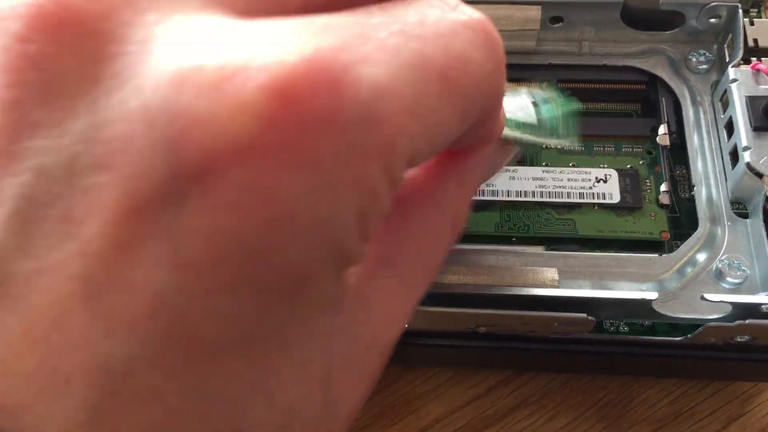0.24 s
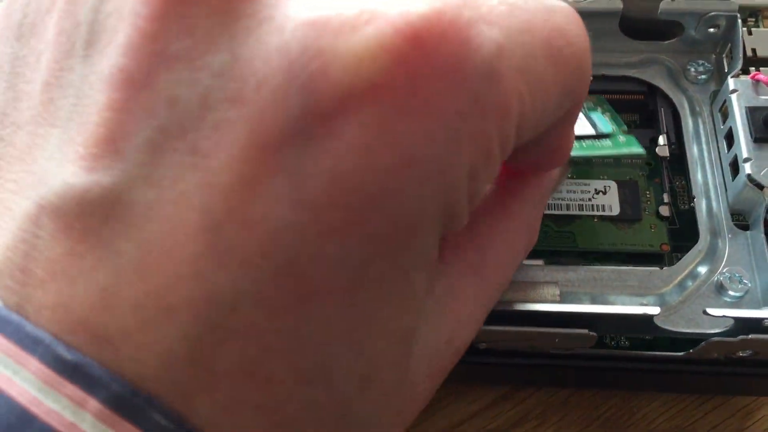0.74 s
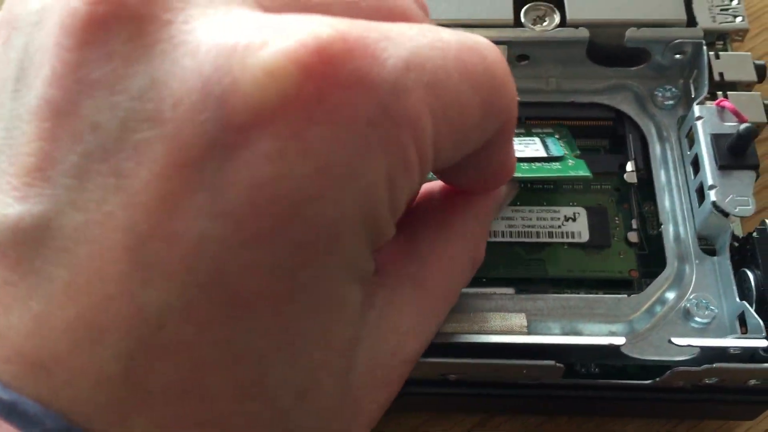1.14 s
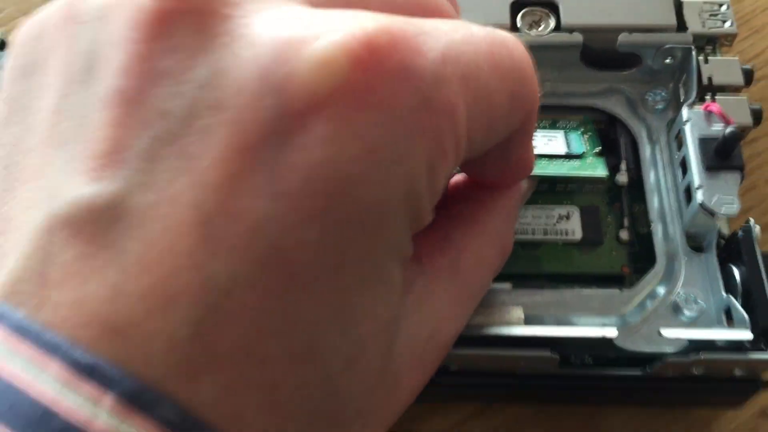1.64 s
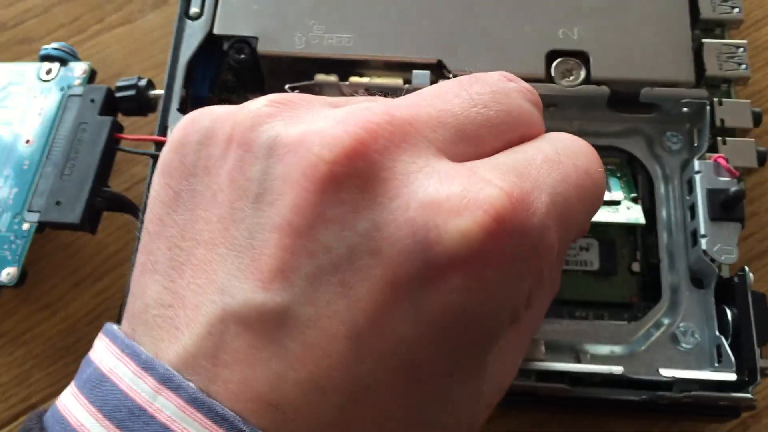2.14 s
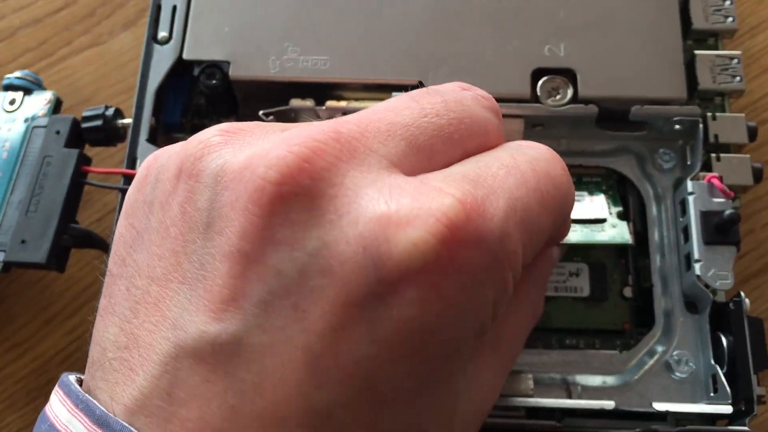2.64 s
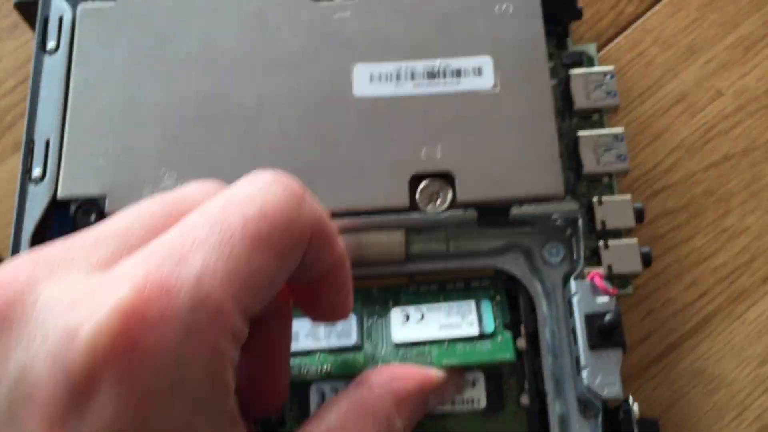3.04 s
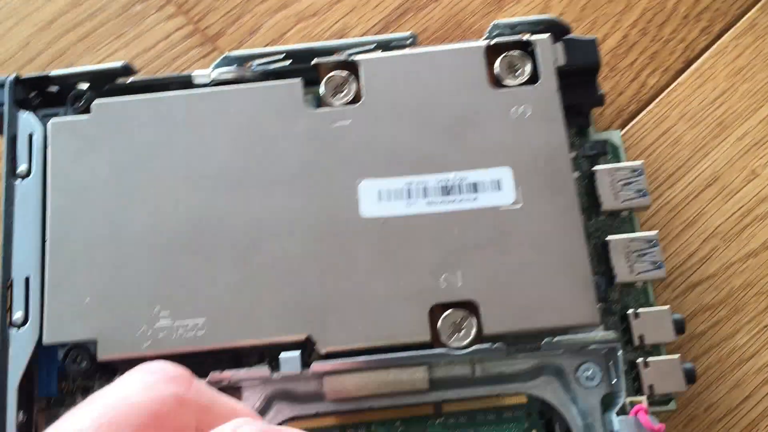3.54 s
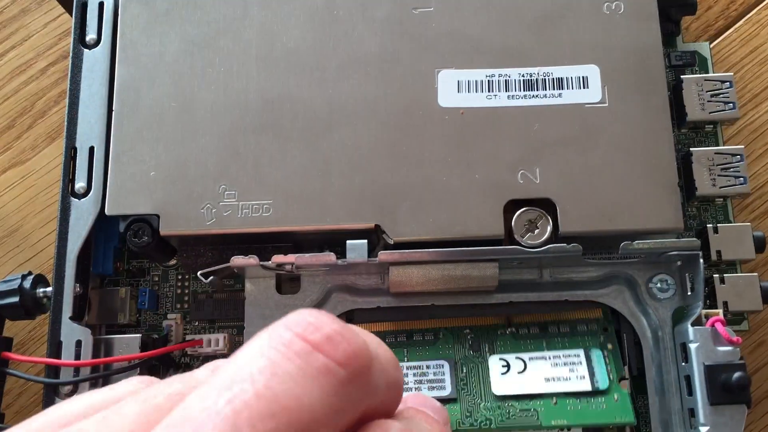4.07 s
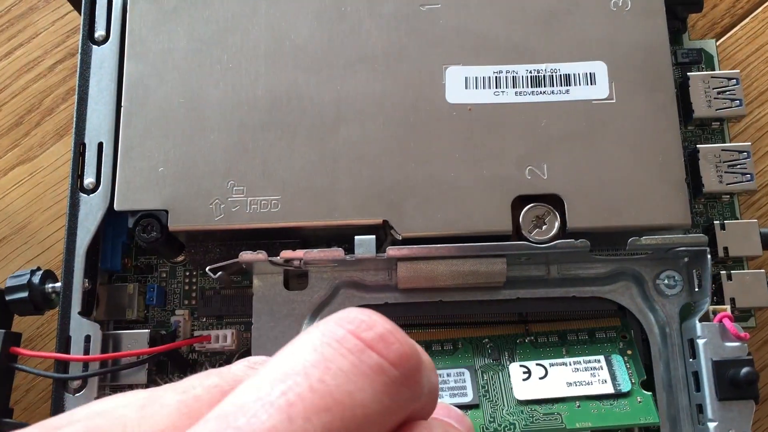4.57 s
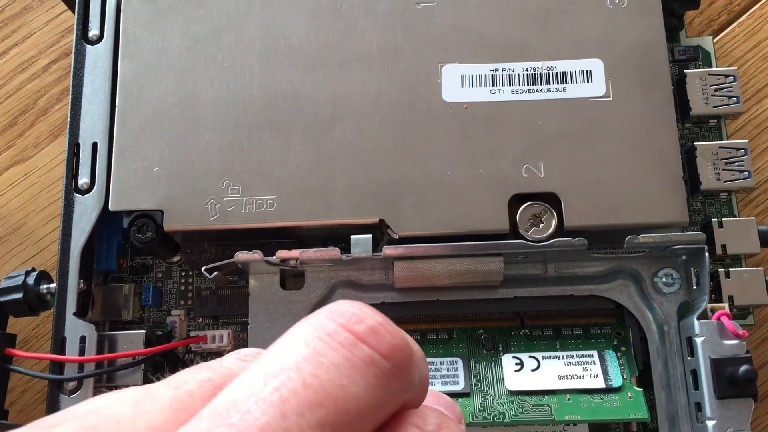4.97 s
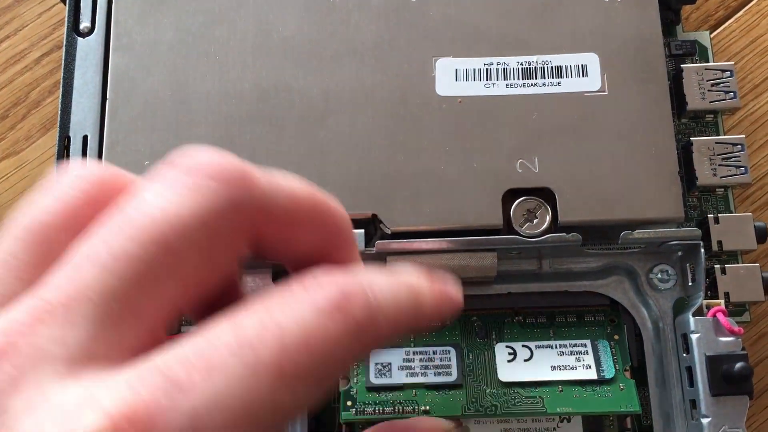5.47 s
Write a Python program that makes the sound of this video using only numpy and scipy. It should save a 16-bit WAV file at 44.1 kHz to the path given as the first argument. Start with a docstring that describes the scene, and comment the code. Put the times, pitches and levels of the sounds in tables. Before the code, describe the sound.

One sharp metallic click, a few faint ticks, then a run of small clicks as a memory module is pressed into a computer.

```python
"""A memory module is worked into its slot in a small open computer on a wooden table, heard up close.
It knocks once on the steel chassis, scrapes and ticks into place, creaks as it is pressed down, and
snaps into its clips. Each click rings the chassis, the circuit board and the contacts. Fingers rub,
a hand bumps the table, and a small room answers over a low rumble."""
import sys
import numpy as np
from scipy import signal
from scipy.fft import rfft, irfft
from scipy.io import wavfile

SR = 44100
rng = np.random.default_rng(int(sys.argv[2]) if len(sys.argv) > 2 else 0)


def int16_out(signal):
    """Quantize to a 16-bit WAV file."""
    q = np.round(np.clip(np.atleast_2d(signal).T, -1, 1) * 32767)
    wavfile.write(sys.argv[1], SR, q.astype(np.int16))


N = 251811
TIME = np.arange(N) / SR

# The tone of the room's air and of rubbing. Each row: frequency in Hz, relative level in dB.
AIR_TONE = [(15, -26), (28, -33), (53, 1), (82, -13), (125, -10), (185, -19), (320, -15), (450, -34.5),
            (1300, -32.5), (2300, -40), (3000, -43), (3800, -47.5), (8000, -51), (15500, -55.5)]
RUB_TONE = [(400, -7.5), (900, 4.5), (1350, -14), (1900, -3), (2700, -8.5), (3800, -9.5), (6500, -19),
            (10000, -37), (15500, -29.5)]
# The room's hums. Each row: pitch in Hz, width in Hz, level in dB.
ROOM_HUMS = [(53.15, 7, -58), (119.9, 21, -64.5), (170.6, 8, -71.5), (343.6, 4.7, -68)]
# The shape of the bass's rise and fall. Each row: time in seconds, relative level in dB.
BASS_SWELLS = [(0.0, -54.5), (1.46, -58.5), (1.69, -52), (2.07, -57.5), (2.37, -53), (2.94, -54.5),
               (3.4, -56), (3.5, -55.5), (3.94, -54), (4.47, -53.5), (5.06, -56), (5.71, -53)]
# Rubs along the chassis. Each row: middle in seconds, half length in seconds, level in dB.
RUB_STROKES = [(0.207, 0.045, -73), (1.288, 0.044, -68), (1.848, 0.11, -70.5), (3.078, 0.43, -75.5),
               (3.856, 0.087, -68.5), (4.35, 0.13, -81), (4.7, 0.023, -62.5), (5.257, 0.033, -65),
               (5.7, .04, -79.5)]
# The module's slips. Each row: start in seconds, length in seconds, chassis level in dB,
# centre of the chassis ring in Hz, board level in dB, contact level in dB.
SLIPS = [(0.0984, .003, -76, 1200, -63, -65), (0.1084, .0012, -63, 1360, -56, -53),
         (0.381, 0.0028, -56, 1200, -53, -52.5), (0.4101, .0012, -18, 1560, -26, -25.5),
         (1.212, 0.0037, -57.5, 1910, -65, -80), (1.291, 0.02, -61.5, 1610, -58, -69.5),
         (1.631, 0.0099, -52.5, 1577, -53.5, -60.5), (1.813, .004, -61.5, 1880, -71, -85),
         (1.909, 0.011, -54.5, 1080, -60.5, -68), (1.9272, 0.0014, -39, 1450, -52, -49.5),
         (2.523, 0.0052, -58, 1245, -74, -87.5), (2.891, .005, -52.5, 1310, -57, -68.5),
         (3.249, 0.0026, -53, 1345, -57, -62.5), (3.813, .007, -65, 1230, -67, -79),
         (4.0554, 0.0032, -58.5, 1130, -62.5, -77.5), (4.1227, 0.0036, -58.5, 1150, -62, -74),
         (4.168, .0045, -40.5, 1440, -67, -73.5), (4.2445, 0.0036, -28.5, 1300, -37.5, -45.5),
         (4.3176, .0032, -43.5, 1273, -56, -67.5), (4.458, .006, -55.5, 1195, -77, -92),
         (4.651, 0.0057, -55.5, 1310, -79, -88), (4.693, 0.016, -47, 1440, -58.5, -66),
         (4.707, 0.0023, -33.5, 1280, -39.5, -64), (4.7935, 0.0025, -34, 1510, -38.5, -42.5),
         (4.836, 0.0063, -37.5, 1280, -53, -64.5), (4.9, 0.005, -51.5, 1230, -77.5, -97),
         (5.085, 0.0044, -56.5, 1160, -58, -86), (5.0993, 0.0018, -28, 1194, -41.5, -54.5),
         (5.1513, 0.0015, -43, 1290, -53.5, -64), (5.197, 0.0078, -41.5, 1180, -54, -67),
         (5.213, 0.016, -42, 1170, -53.5, -71), (5.2564, 0.0033, -37.5, 1245, -51, -68),
         (5.327, 0.0039, -59, 1440, -57.5, -70.5), (5.3985, 0.0023, -33.5, 1200, -37, -38.5),
         (5.6067, 0.0038, -62, 1350, -61, -68.5)]
# The notes each part rings with. Each row: pitch in Hz, relative level in dB, seconds to fade by 60 dB.
CONTACT_NOTES = [(6713, 5, .006), (8700, -2.5, .007), (8905, 4, 0.0058), (9400, 3, .01), (9810, -9.5, .008),
                 (11400, -2.5, .006), (11780, -3, .006), (12260, -6.5, 0.0081), (13400, -5.5, 0.0066),
                 (14680, -7, 0.0062)]
BOARD_NOTES = [(2437, -1.5, 0.043), (2640, -0.5, 0.014), (2828, -9, 0.072), (2958, -6, 0.05),
               (3140, -3, 0.035), (3330, -5, .03), (3422, -1.5, 0.028), (4180, -5.5, 0.062),
               (4600, -5.5, 0.018), (5470, 2.5, 0.015), (5860, 6.5, 0.02), (6267, -3.5, 0.042)]
CHASSIS_NOTES = [(668, 5, 0.052), (847.6, 2, 0.11), (936, -5.5, 0.0553), (997, -3, 0.047),
                 (1098, -13.5, 0.041), (1237, -4.5, 0.07), (1317, -0.5, 0.11), (1440, -7.5, 0.064),
                 (1530, -16, 0.0613), (1610, 0, 0.041), (1776, 1, 0.011), (1926, 0, 0.056), (2111, 1, 0.15),
                 (2340, -10.5, 0.044)]
TABLE_NOTES = [(95, -6.5, 0.19), (164, -7, 0.28), (214.4, -2, 0.076), (347.7, 1.5, 0.14),
               (447, -9.5, 0.029), (585, -15.5, 0.048)]
# The room's echo. Each row: frequency in Hz, level in dB against the direct sound, seconds to fade 60 dB.
ROOM_ECHO = [(100, -16.5, 0.42), (340, -1, 0.63), (700, -8.5, 0.35), (1529, -14.5, 0.75), (2107, -10, 0.56),
             (2930, -15, 0.66), (4550, -14, 0.51), (6540, -16, 0.61), (11000, -18.5, .33),
             (13896, -11.5, 0.32)]
# Single notes of the chassis, board or contacts that ring on after some clicks.
# Each row: start in seconds, pitch in Hz, level in dB, seconds to fade by 60 dB.
LINGERING_NOTES = [(.4103, 11400, -13.5, 0.0068), (0.4115, 1544, -22, 0.074), (1.631, 9120, -51.5, 0.037),
                   (1.928, 4400, -39, 0.015), (1.928, 826, -48.5, .15), (3.249, 2990, -40, 0.023),
                   (5.397, 2828, -22, 0.017), (5.4, 1850, -28.5, 0.048), (5.4, 838, -37, 0.11),
                   (5.4, 6030, -22, 0.0063)]
# The board's edge drags. Each row: middle in seconds, half length in seconds, pitch in Hz, level in dB.
EDGE_DRAGS = [(1.295, .02, 1640, -63.5), (1.295, 0.017, 3200, -70), (2.529, .01, 1286, -61),
              (3.76, 0.0084, 2500, -67), (3.825, 0.02, 2500, -68.5), (4.015, 0.022, 2184, -68),
              (4.059, 0.0025, 2650, -48.5), (4.058, 0.0045, 3580, -62.5), (4.476, 0.01, 1180, -61)]
# The hand bumps the table. Each row: middle in seconds, level in dB, pitch in Hz.
HAND_BUMPS = [(1.584, -38.5, 95), (1.609, -50.5, 124), (4.449, -39, 100), (5.294, -39.5, 95),
              (5.415, -36.5, 106)]


def amp(db):
    """Turns decibels into a gain."""
    return 10 ** (np.asarray(db) / 20)


def evened(x):
    """Scales a sound to an average power of 1."""
    return x / np.sqrt(np.mean(x ** 2) + 1e-20)


def look_up(points, hz, column=1):
    """Reads a table's column at any frequency, gliding between rows."""
    columns = np.transpose(points)
    return np.interp(np.log(hz + 1), np.log(columns[0]), columns[column])


def coloured(x, tone):
    """Gives a sound the tone in a table, at a power of 1."""
    hz = np.fft.rfftfreq(len(x), 1 / SR)
    return evened(irfft(rfft(x) * amp(look_up(tone, hz)), len(x)))


def add(mix, start, sound):
    """Mixes a sound in at a start time in seconds."""
    part = mix[max(round(start * SR), 0):][:len(sound)]
    part += sound[:len(part)]


def narrow_noise(size, centre_hz, width_hz):
    """Noise gathered around one pitch, at a power of 1."""
    hz = np.fft.rfftfreq(size, 1 / SR)
    spectrum = rfft(rng.standard_normal(size)) / (1 + ((hz - centre_hz) / width_hz) ** 2)
    return evened(irfft(spectrum, size))


def background(air_db=-54.5, sway=0.92):
    """The room's air and hums; the low rumble drifts unevenly louder and softer."""
    air = amp(air_db) * coloured(rng.standard_normal(N), AIR_TONE)
    for hz, width, db in ROOM_HUMS:
        air += amp(db) * narrow_noise(N, hz, width)
    bass = signal.sosfiltfilt(signal.butter(3, 300, fs=SR, output="sos"), air)
    level_db = np.interp(TIME, *np.transpose(BASS_SWELLS))
    swell_db = sway * np.clip(level_db - np.median(level_db), -6, 5)
    return air + bass * (amp(swell_db) - 1)


def rubbing(grip_db=-75.5, spread_db=4, catches_per_s=700):
    """Skin and board edge catch in tiny, uneven grains: faintly from the grip, more with each stroke."""
    catches = rng.random(N) < catches_per_s / SR
    sizes = amp(spread_db * np.minimum(rng.exponential(1, N), 4)) * rng.standard_normal(N)
    t = np.arange(SR // 30) / SR
    grain = rng.standard_normal(len(t)) * np.exp(-t / 0.0049)
    patter = signal.fftconvolve(catches * sizes, grain)[:N]
    power = amp(grip_db) ** 2
    for middle, half, db in RUB_STROKES:
        power += amp(db) ** 2 * np.exp(-((TIME - middle) / half) ** 2)
    return np.sqrt(power) * coloured(patter, RUB_TONE)


def catch_burst(size, length):
    """The spectrum of a sudden, fading burst of tiny catches, about as strong at every pitch."""
    age = np.arange(size) / SR / max(length, 1e-4)
    burst = rng.standard_normal(size) * np.exp(-age)
    for _ in range(3):  # even out the tone, then make the burst short again
        spectrum = rfft(burst)
        burst = irfft(spectrum / (abs(spectrum) + 1e-12)) * np.exp(-(age / 4) ** 2)
    return rfft(burst) / np.linalg.norm(burst)


def tone_filter(db):
    """The spectrum of a filter with these gains that rings only after it is struck."""
    log_gain = np.log(amp(np.maximum(db, -80)))
    mirrored = np.r_[log_gain, log_gain[-2:0:-1]]
    return np.exp(np.conj(signal.hilbert(mirrored)))[:len(db)]


def ring(notes, length, haze, centre_hz=1000, focus_db=0, edge_db=45, size=8192):
    """A part rings with its notes and a haze of others; the spot struck favours those near a centre."""
    hz = np.fft.rfftfreq(size, 1 / SR)
    note_hz, db, fade_s = np.transpose(notes)[:, :, None]
    width_hz = np.log(1000) / (2 * np.pi * fade_s)
    phase = np.exp(2j * np.pi * rng.random(db.shape))
    clear = (amp(db) * phase * np.sqrt(width_hz) / (width_hz + 1j * (hz - note_hz))).sum(0)
    octaves_outside = abs(np.log2((hz + 1) / np.clip(hz + 1, note_hz.min(), note_hz.max())))
    clear_level = np.sqrt(np.mean(abs(clear[octaves_outside == 0]) ** 2))
    hazy = haze * clear_level * catch_burst(size, length + 0.1 * fade_s.mean())
    octaves_off_centre = np.hypot(np.log2((hz + 1) / centre_hz), 0.15)
    favour = tone_filter(-focus_db * octaves_off_centre - edge_db * octaves_outside)
    sound = irfft((clear * catch_burst(size, length) + hazy) * favour)[:size * 3 // 4]
    return sound / np.sqrt(np.sum(sound ** 2) / (SR / 200) + 1e-30)  # the energy of 5 ms at power 1


def click(length, ring_db, ring_hz, clack_db, tick_db):
    """One slip of the module rings the contacts and board, and spreads into the chassis and table."""
    bright_db = tick_db - ring_db
    tick_hz = 10600 + 42 * tick_db  # a weaker touch sounds lower
    clack_hz = 2910 + 282.5 * max(bright_db, 0)  # a glancing touch clacks higher
    ring_focus_db = 13 - 0.62 * bright_db  # a dull slip rings a narrower band
    thud_db = min(tick_db - 3, ring_db - 10.5)  # a crisp snap shakes the table
    contacts = ring(CONTACT_NOTES, 1.1 * length, haze=1.1, centre_hz=tick_hz, focus_db=6.5, edge_db=21)
    board = ring(BOARD_NOTES, 0.61 * length, haze=1.048, centre_hz=clack_hz, focus_db=15, edge_db=34.5)
    chassis = ring(CHASSIS_NOTES, length + 0.001, haze=0.56, centre_hz=ring_hz, focus_db=ring_focus_db)
    table = ring(TABLE_NOTES, length + 0.0036, haze=0.35, edge_db=29)
    return amp(ring_db) * chassis + amp(clack_db) * board + amp(tick_db) * contacts + amp(thud_db) * table


def near_echoes(x):
    """Hand, lid and table top throw back quick, duller copies, which join the direct sound."""
    dull = signal.sosfilt(signal.butter(2, 4200, fs=SR, output="sos"), x)
    out = x.copy()
    for delay_s, db in [(0.0045, -23), (0.0078, -10.5), (0.017, -26)]:
        add(out, delay_s, amp(db) * dull)
    return out


def room_echo(x, swell_s=0.003):
    """The room answers with a wash of echoes that swells in, each pitch fading at its own speed."""
    hz, t, noise = signal.stft(rng.standard_normal(SR), SR, nperseg=256)
    fade_s = look_up(ROOM_ECHO, hz, column=2)[:, None]
    gain = amp(look_up(ROOM_ECHO, hz)[:, None] - 60 * t / fade_s)
    gain *= np.sqrt(2 * np.log(1000) / (fade_s * SR))  # a longer fade adds no energy
    tail = signal.istft(gain * noise, SR, nperseg=256)[1][:SR]
    swell = 1 - np.exp(-np.arange(SR) / SR / swell_s)
    return signal.fftconvolve(x, tail * swell)[:N]


def lingering_note(hz, db, fade_s):
    """A single note of the chassis, board or contacts rings on after a click."""
    t = np.arange(SR // 3) / SR
    onset = 1 - np.exp(-t * hz / 2)
    return amp(db - 60 * t / fade_s) * np.sin(2 * np.pi * hz * t) * onset


def edge_scrapes(width_hz=170):
    """The board's edge drags briefly, making noise around one pitch that swells and fades."""
    t = np.arange(-SR // 8, SR // 8) / SR
    out = np.zeros(N)
    for middle, half, hz, db in EDGE_DRAGS:
        swell = np.exp(-(t / half) ** 2 / 2)
        add(out, middle + t[0], amp(db) * narrow_noise(len(t), hz, width_hz) * swell)
    return out


def table_bumps(half_length_s=0.0043):
    """A soft push of the hand gives the table a couple of low swings."""
    t = np.arange(-SR // 25, SR // 25) / SR
    push = np.exp(-(t / half_length_s) ** 2 / 2)
    out = np.zeros(N)
    for middle, db, hz in HAND_BUMPS:
        swing = np.cos(2 * np.pi * (hz * t + rng.random()))
        add(out, middle + t[0], amp(db) * push * swing)
    return out


def scene():
    """Scrapes, clicks and lingering notes echo in a small room, over rubbing, bumps and background."""
    handling = edge_scrapes()
    for start, *slip in SLIPS:
        add(handling, start, click(*slip))
    for start, *note in LINGERING_NOTES:
        add(handling, start, lingering_note(*note))
    return (near_echoes(handling) + room_echo(handling) + rubbing() + table_bumps() + background())[None]


def record(dry):
    """Cuts away the highest treble, above 15450 Hz."""
    treble_cut = signal.firwin(511, 15450, window=("kaiser", 9), fs=SR)
    return signal.oaconvolve(dry, treble_cut[None], "same")


dry = scene()
out = record(dry)
int16_out(out)
```